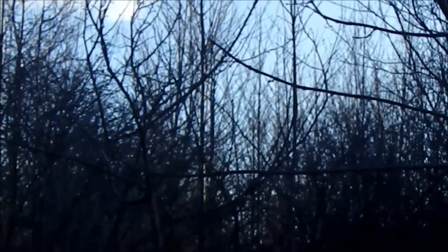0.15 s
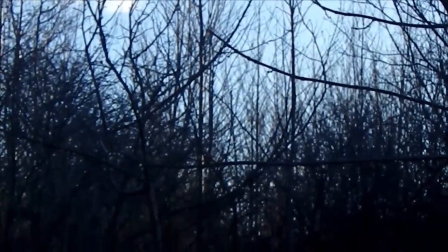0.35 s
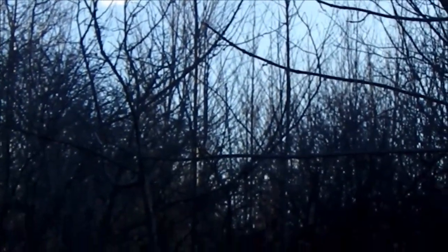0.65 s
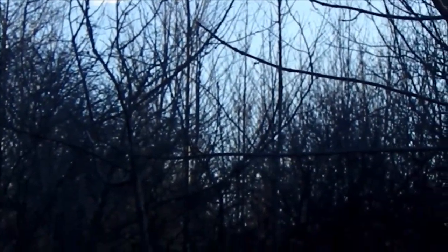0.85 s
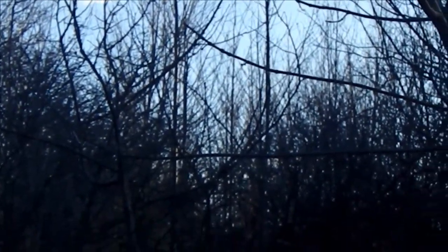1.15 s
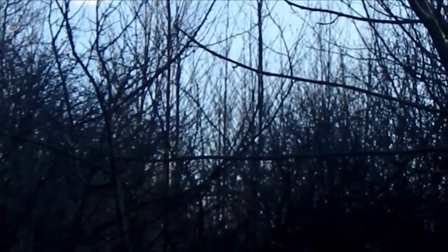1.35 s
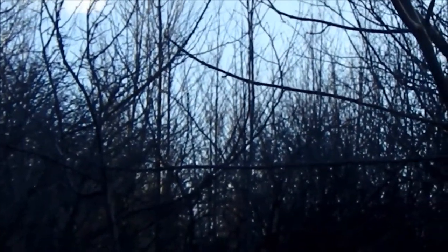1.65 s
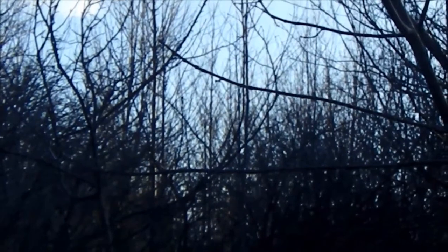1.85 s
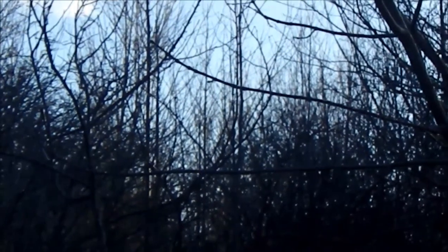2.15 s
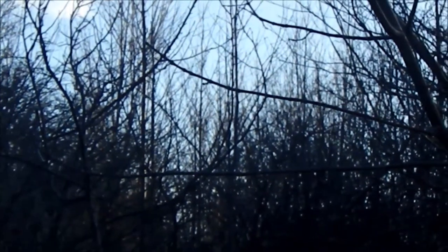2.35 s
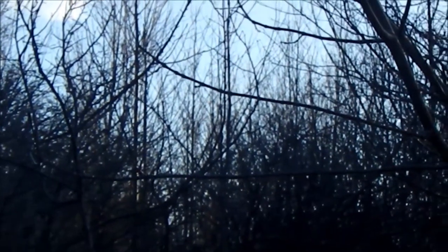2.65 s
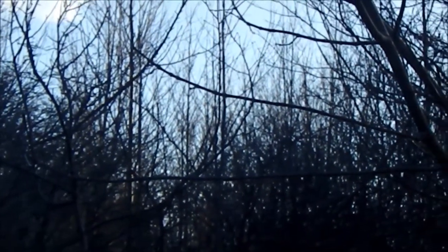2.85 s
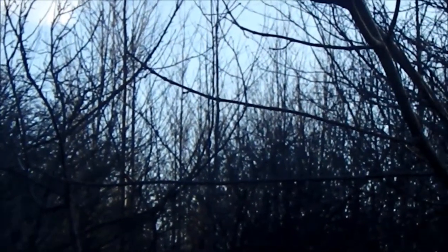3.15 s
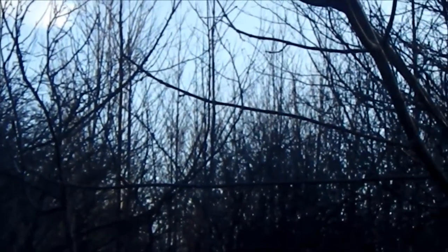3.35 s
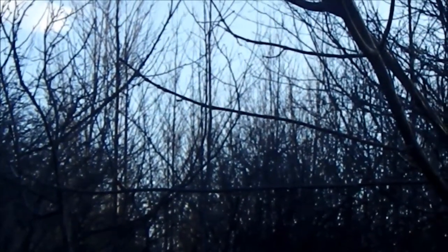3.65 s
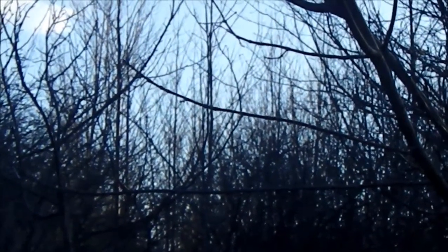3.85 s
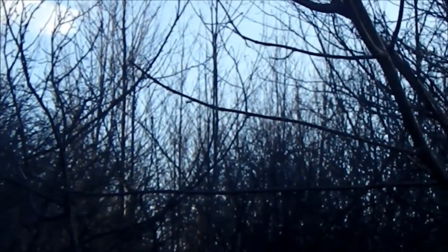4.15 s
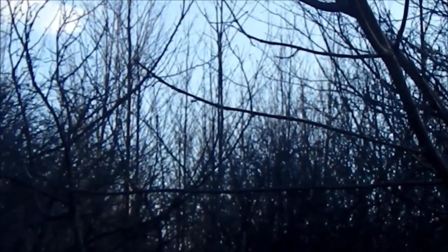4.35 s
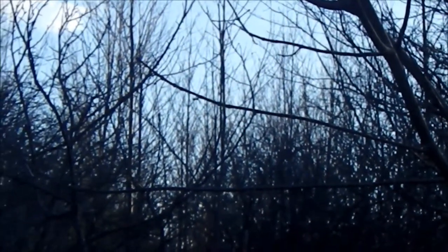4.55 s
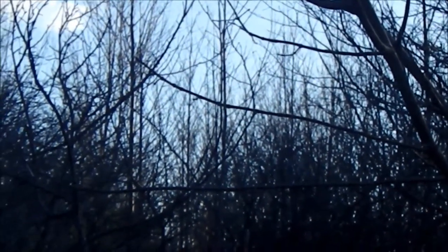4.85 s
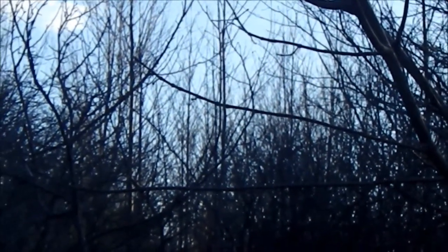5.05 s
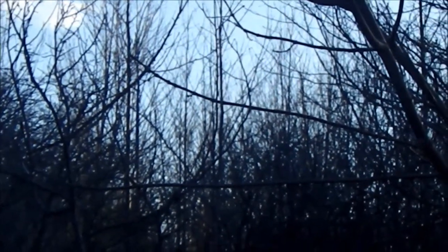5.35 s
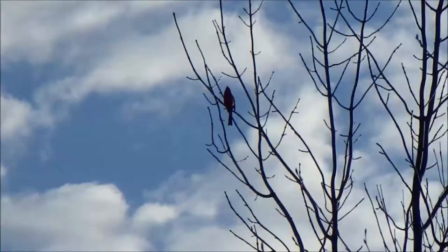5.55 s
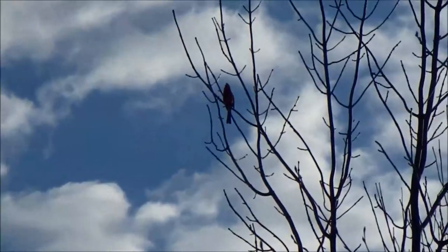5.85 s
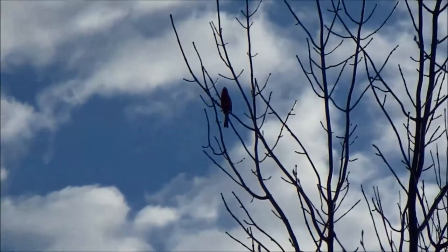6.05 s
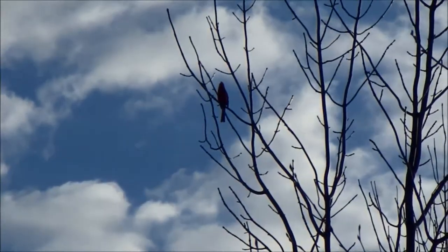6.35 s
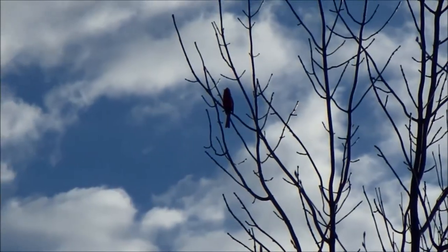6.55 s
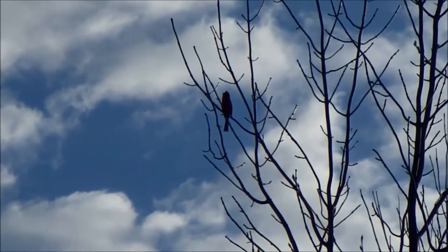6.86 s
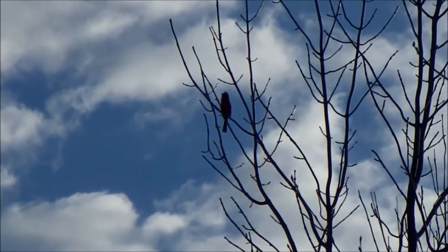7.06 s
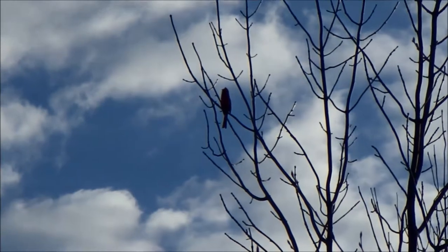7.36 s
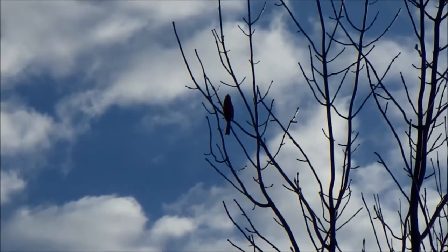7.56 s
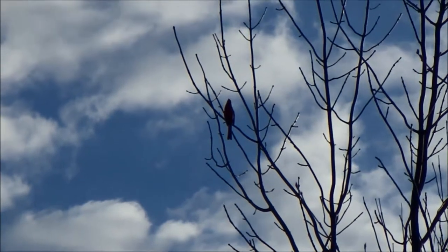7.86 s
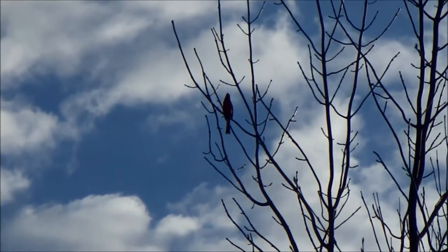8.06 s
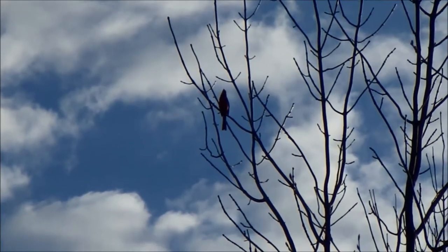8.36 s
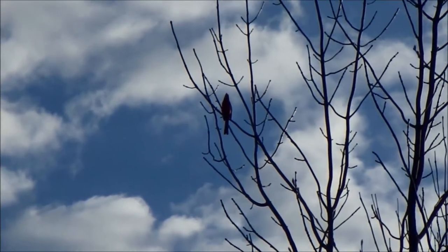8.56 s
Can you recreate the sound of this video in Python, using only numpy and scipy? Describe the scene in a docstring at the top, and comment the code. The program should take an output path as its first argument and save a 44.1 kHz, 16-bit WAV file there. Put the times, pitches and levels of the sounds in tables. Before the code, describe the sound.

A cardinal sings slow rising slurred whistles, then upward whips that come ever faster, over faint small birds and soft outdoor murmur in bare woods.

```python
"""Cardinal in a bare treetop

A cardinal sings two songs: slow rising slurs, then upward whips that come ever faster.
Each note is a gliding sine with overtones: a soft low lead-in breaks into a loud sweep, echoed by the
ground and the trunks. Further off a gull cries twice in hoarse and clear harmonics, small birds chip and
whistle in gliding sines, and shaped noise makes twig ticks, soft bumps, far calls and distant traffic."""
import sys
import numpy as np
from scipy import signal
from scipy.fft import rfft, irfft
from scipy.io import wavfile
from scipy.ndimage import uniform_filter1d

SR = 44100
rng = np.random.default_rng(int(sys.argv[2]) if len(sys.argv) > 2 else 0)


def unload_audio(sound):
    """Save the sound as a 16-bit wav file, at the path given as the first command line argument."""
    columns = np.transpose(np.atleast_2d(sound))
    # keep every value between -1 and 1, then stretch to whole-number steps
    steps = np.round(np.clip(columns, -1, 1) * 32767)
    wavfile.write(sys.argv[1], SR, steps.astype(np.int16))


N = 383229
TIME = np.arange(N) / SR


def undb(db):
    """Decibels to gain."""
    return 10 ** (np.asarray(db) / 20)


def gain_at(hz, spectrum):
    """Gain of a (f/Hz, level/dB) spectrum, joined on a log-frequency axis."""
    points, db = np.transpose(spectrum)
    return undb(np.interp(np.log(hz + 1), np.log(points), db))


def noise(spectrum):
    """Noise of unit rms with the given colour."""
    bins_hz = np.arange(N // 2 + 1) * SR / N
    x = irfft(rfft(rng.standard_normal(N)) * gain_at(bins_hz, spectrum), N)
    return x / x.std()


def walk(rate):
    """Smooth random drift with a new target rate times a second; spread 1."""
    hold = max(int(SR / rate), 1)
    steps = np.repeat(rng.standard_normal(N // hold + 1), hold)[:N]
    x = uniform_filter1d(steps, hold)
    return x / x.std()


def add(out, start, sound):
    """Mix a sound in at a time in seconds."""
    i = max(int(start * SR), 0)
    out[i:i + len(sound)] += sound[:max(N - i, 0)]


def envelope(t, length, attack, release):
    """Smooth attack, hold and release; length, attack and release share the unit of t."""
    rise = np.sin(np.pi / 2 * np.clip(t / attack, 0, 1))
    fall = np.sin(np.pi / 2 * np.clip((length - t) / release, 0, 1))
    return (rise * fall) ** 2


def strikes(rows, decay_s):
    """Loudness of (t/s, level/dB) events that start at once and die away exponentially."""
    out = np.zeros(N)
    for s, db in rows:
        add(out, s, undb(db) * np.exp(-TIME / decay_s))
    return out


def phase_of(hz, waver):
    """Phase of a pitch curve that a random stretch of waver bends."""
    start = rng.integers(N - SR)
    return 2 * np.pi * np.cumsum(hz * (1 + waver[start:start + len(hz)])) / SR


def woods(x, early_db, late_db, early_t60, late_t60):
    """Echoes only: near trunks throw back clumps of reflections, the deeper wood a long grainy tail."""
    t = TIME[:SR]
    # sparse random reflections: 1.5 % of samples for the trunks, 4 % for the depth
    trunks, depth = rng.standard_normal((2, SR)) * (rng.random((2, SR)) < [[.015], [.04]])
    clumps = undb(2.5 * walk(130)[:SR])
    build_up = 1 - np.exp(-t / .014)
    response = 0
    for grain, db, t60 in ((trunks, early_db, early_t60), (depth, late_db, late_t60)):
        tail = grain * clumps * np.exp(-np.log(1000) * t / t60) * build_up
        response = response + undb(db) * tail / np.linalg.norm(tail)
    return signal.fftconvolve(x, response)[:N]


def far_sound(spectrum, flutter_db, flutter_rate):
    """A sound that distance has smeared into a fluttering band of noise."""
    return noise(spectrum) * undb(flutter_db * walk(flutter_rate))


# colour of the outdoor rumble: f/Hz, relative level/dB
RUMBLE_COLOUR = [(12, -4.5), (25, -1.5), (45, -5), (80, -9), (125, -9), (190, -20), (300, -56)]
# slow course of the rumble, before its flutter: t/s, level/dB
RUMBLE_LEVEL = [(0, -54), (4.6, -52.5), (5.55, -51), (6.2, -55), (8.6, -53)]


def rumble():
    """Outdoor rumble: low fluttering noise that slowly rises and sinks."""
    level_db = np.interp(TIME, *np.transpose(RUMBLE_LEVEL))
    return far_sound(RUMBLE_COLOUR, flutter_db=1.2, flutter_rate=6.8) * undb(level_db)


# colour of the murmur in the mids: f/Hz, relative level/dB
MURMUR_COLOUR = [(110, -14.5), (180, -5), (237, -6), (286, -1), (366, -1), (486, 1), (602, -2), (792, -1.5),
                 (850, 0), (954, -1.5), (1040, -10.5), (1130, -9), (1220, -3.5), (1500, -19.5), (1950, -39),
                 (3300, -120)]
# colour of the airy hiss: f/Hz, relative level/dB
HISS_COLOUR = [(900, -17), (1500, 2.5), (2100, -1), (2800, -3), (3700, -1.5), (4500, -2.5), (5400, -5.5),
               (8000, -9), (14800, -7.5), (15700, -18)]


def air(murmur_db=-47, hiss_db=-53):
    """Outdoor bed: a murmur that barely flutters under a steady hiss."""
    murmur = noise(MURMUR_COLOUR) * undb(murmur_db + 0.11 * walk(5.3))
    return murmur + noise(HISS_COLOUR) * undb(hiss_db)


# colour of the buzzy trill: f/Hz, relative level/dB
TRILL_COLOUR = [(900, -2), (1550, 6), (2150, -7), (2600, -30), (3300, -12), (3550, 6), (3800, -6),
                (5100, 1), (5700, -32), (8000, -40)]


def trill(start_s=1.506, level_db=-50.0):
    """A buzzy trill: banded noise in fast flutter that fades in and out."""
    buzz = far_sound(TRILL_COLOUR, flutter_db=1.0, flutter_rate=70)
    return buzz * undb(level_db) * envelope(TIME - start_s, .8, 0.18, 0.15)


# colour of the far rasping calls: f/Hz, relative level/dB
RASP_COLOUR = [(950, -54), (1130, 0.5), (1220, 3.5), (1340, -3), (1600, -14), (2200, -16), (3200, -33),
               (6000, -70)]
# the rasping calls, before their onsets are softened: t/s, level/dB
RASP_CALLS = [(3.07, -43), (3.54, -47.5), (4.01, -48), (4.5, -50.5), (5.9, -50)]


def rasps():
    """Far rasping calls: rough noise with softened onsets that dies away slowly."""
    loudness = uniform_filter1d(strikes(RASP_CALLS, decay_s=0.42), size=5500)
    return far_sound(RASP_COLOUR, flutter_db=2.2, flutter_rate=40) * loudness


# colour of the distant traffic: f/Hz, relative level/dB
TRAFFIC_COLOUR = [(150, -19), (260, -6.5), (330, 6), (480, -10), (650, -6), (820, -3), (1050, -51)]


def traffic(start_s=5.63, level_db=-51):
    """One swell of distant traffic: low band noise under a slow envelope."""
    hum = far_sound(TRAFFIC_COLOUR, flutter_db=0.5, flutter_rate=5.5)
    return hum * undb(level_db) * envelope(TIME - start_s, 2.14, 0.53, 0.72)


def background():
    """Everything that lies behind the birds, mixed as one bed."""
    return rumble() + air() + trill() + rasps() + traffic()


# soft bumps: t/s, level/dB
BUMP_HITS = [(4.634, -42), (5.595, -40)]
# their dull colour: f/Hz, relative level/dB
BUMP_COLOUR = [(40, 0), (220, 6), (500, -31)]


def handling():
    """Soft handling bumps: short decaying bursts of dull noise."""
    return strikes(BUMP_HITS, decay_s=0.011) * noise(BUMP_COLOUR)


# twig ticks, before a common trim of -3 dB: t/s, level/dB
TWIG_TICKS = [(1.249, -41), (1.355, -39), (1.552, -32), (2.346, -42), (2.408, -44), (5.133, -38),
              (5.255, -34), (5.602, -37), (5.796, -37), (6.355, -23.5)]
# colour of dry wood: f/Hz, relative level/dB
TWIG_COLOUR = [(200, 9), (1100, 6), (2200, -9), (3500, -1), (5300, 1.5), (6300, -3), (12000, -29)]


def twigs():
    """Dry ticks: noise bursts that die in a few milliseconds, echoed by the wood."""
    out = undb(-3) * strikes(TWIG_TICKS, decay_s=.003) * noise(TWIG_COLOUR)
    return out + woods(out, early_db=-13, late_db=-22, early_t60=.12, late_t60=.6)


def whistle(length, start_hz, end_hz, arch_hz, waver, attack_share=0.14, release_share=0.15):
    """A pure glide bent into an arch."""
    t = np.arange(0, length, 1 / SR)
    u = t / length
    hz = start_hz + (end_hz - start_hz) * u + arch_hz * (1 - (2 * u - 1) ** 2)
    return envelope(u, 0.99, attack_share, release_share) * np.sin(phase_of(hz, waver))


def chip(buzz, length=0.024, start_hz=9700, end_hz=6450, fall_s=.0045):
    """A rough note that plunges and levels out."""
    t = np.arange(0, length, 1 / SR)
    hz = end_hz + (start_hz - end_hz) * np.exp(-t / fall_s)
    return envelope(t, length, 0.01, 0.0095) * np.sin(phase_of(hz, buzz))


# far whistles: t/s, length/s, start f/Hz, end f/Hz, arch added midway f/Hz, level/dB
FAR_WHISTLES = [(0.051, 0.26, 3690, 3670, 42, -61.5), (1.269, 0.26, 6520, 6480, 51, -54),
                (1.37, 0.2, 3990, 3804, 123, -51.5), (1.65, 0.13, 5250, 5290, -220, -51.5),
                (1.77, 0.092, 5220, 5100, 8, -56), (1.936, 0.067, 5020, 5000, -130, -53),
                (2.002, 0.066, 4960, 5070, 40, -49), (2.24, 0.083, 4930, 5030, 30, -58),
                (2.2, 0.1, 3820, 3850, 96, -60), (2.26, .06, 3050, 2250, 220, -54),
                (2.31, .05, 2280, 2700, -200, -58), (2.35, 0.075, 2730, 2400, 396, -54.5),
                (2.73, .11, 2000, 2100, 109, -59), (2.88, 0.12, 2330, 2400, 400, -54.5),
                (5.19, 0.096, 1270, 1214, 342, -51.5), (5.465, 0.095, 1284, 1227, 320, -53),
                (5.505, 0.071, 2970, 2320, 280, -51), (5.805, 0.15, 4240, 3680, 7, -56),
                (7.41, .17, 7040, 7330, -30, -55.5), (7.783, .165, 7000, 7100, 30, -48)]
# thin rising calls: t/s, level/dB
THIN_CALLS = [(.569, -62), (.644, -58), (1.004, -56), (1.084, -62), (1.184, -61), (5.152, -58),
              (5.364, -64)]
# a small bird's falling chips: t/s, level/dB
FALLING_CHIPS = [(.342, -46), (2.447, -46), (2.517, -49), (2.597, -50), (3.076, -45), (3.425, -43.5),
                 (3.517, -44), (3.814, -48.5), (5.027, -50)]


def small_birds():
    """Thin whistles and rough little chips from deeper in the wood: gliding sines with wavering pitch."""
    out = np.zeros(N)
    waver = 0.0051 * walk(90)
    buzz = .02 * walk(900)
    for s, length, start_hz, end_hz, arch_hz, db in FAR_WHISTLES:
        add(out, s, undb(db) * whistle(length, start_hz, end_hz, arch_hz, waver))
    for s, db in THIN_CALLS:
        call = whistle(length=.042, start_hz=5800, end_hz=6900, arch_hz=0, waver=waver)
        add(out, s, undb(db) * call)
    for s, db in FALLING_CHIPS:
        add(out, s, undb(db) * chip(buzz))
    return out + woods(out, early_db=-4.5, late_db=-7, early_t60=0.16, late_t60=0.44)


# how strongly each pitch of the gull's cry is heard, with a notch near 1070 Hz: f/Hz, level/dB
GULL_COLOUR = [(600, -18), (940, 3), (1010, 3), (1070, -14), (1190, 7.5), (1750, 3.5), (1970, -2),
               (2150, 1.5), (2450, -12), (3050, -4), (3500, -11), (4200, 5), (5000, -12), (6000, -30)]
# cries: t/s at the flip into the squeal, squeal length/s, squeal f/Hz before it sags,
# level/dB before each part's own offset
GULL_CRIES = [(0.646, .22, 1012, -49.5), (1.194, .19, 1086, -46.5)]


def gull(scoop_s=.085, drop_s=0.045, low_share=.53, scoop_rise=.28, scoop_db=3, sag=0.13, fade_db=-9,
         drop_share=.62, drop_fall=0.124, drop_db=3, dull_hz=2900):
    """A dull, hoarse scoop flips up into a bright sagging squeal, then drops back into the low voice."""
    out = np.zeros(N)
    clear, hoarse = 0.0054 * walk(180), 0.013 * walk(300)
    for s, squeal_s, hz, db in GULL_CRIES:
        scoop, squeal, drop = (np.linspace(0, 1, int(length * SR)) for length in (scoop_s, squeal_s, drop_s))
        # start in seconds, pitch as a share of the squeal's, level offset in dB, waver, treble edge in Hz
        parts = [(s - scoop_s, low_share + scoop_rise * scoop ** 2, scoop_db - 6 * (1 - scoop), hoarse, dull_hz),
                 (s, 1 - sag * squeal ** 2, fade_db * squeal ** 2, clear, SR),
                 (s + squeal_s, drop_share - drop_fall * drop, drop_db, hoarse, dull_hz / 2)]
        for start, share, part_db, waver, edge_hz in parts:
            pitch, t = hz * share, TIME[:len(share)]
            phase = phase_of(pitch, waver)
            cry = 0
            for k in range(1, 7):
                dulling = np.hypot(1, (k * pitch / edge_hz) ** 2)
                cry = cry + gain_at(k * pitch, GULL_COLOUR) / dulling * np.sin(k * phase)
            add(out, start, undb(db + part_db) * envelope(t, t[-1], 0.0059, 0.0039) * cry)
    return out + woods(out, early_db=-7, late_db=-12, early_t60=0.17, late_t60=0.92)


BREAK_HZ = 1898.6  # pitch at which a slur's lead-in turns into the sweep
BREAK_DIP_DB, BREAK_WIDTH_S, BREAK_LAG_S = -4.5, 0.0027, 0.0014  # the voice falters just before the break
SURGE_AT, SURGE_WIDTH = 0.372, .16  # the pitch spurts ahead partway up: place and width as shares of the sweep
EASY_DB, BRIGHT_DB_PER_DB = -18.5, 0.67  # notes louder than an easy one are also brighter
# what the throat and beak let through: f/Hz, level/dB
BEAK_RESONANCES = [(3900, 1), (5300, -10.5), (6200, -8), (7300, -1.5), (8400, 3), (9600, -8), (11500, -11),
                   (13500, -25)]
# overtones from twice the pitch upward, before beak and brightness: level/dB
OVERTONE_LEVELS = [-22.5, -26, -22, -30.5, -20.5]
# the voice gains strength as it climbs: f/Hz of the pitch, level/dB
REGISTER_STRENGTH = [(1230, -30.5), (1450, -30.5), (1600, -17.5), (1760, -10), (1870, -8), (2080, -1.5),
                     (2500, -2), (3400, -1)]


def cardinal_note(sweep_s, top_hz, lead_s, start_hz, break_hz, lead_bow, sweep_bow, surge_hz, swell_db,
                  attack_share, release_s, bright_db, waver,
                  split_db=-27, split_share=.87, split_ratio=1.575, purity_hz=2850):
    """A lead-in creeps up to the register break, the sweep climbs; a faint second voice joins at the top."""
    t = np.arange(0, lead_s + sweep_s, 1 / SR)
    lead = np.clip(t / lead_s, 0, 1)
    climb = np.clip((t - lead_s) / sweep_s, 0, 1)
    hz = start_hz + (break_hz - start_hz) * (1 - (1 - lead) ** lead_bow)
    hz = hz + (top_hz - break_hz) * climb ** sweep_bow
    hz = hz + surge_hz * np.exp(-((climb - SURGE_AT) / SURGE_WIDTH) ** 2)
    # the voice rounds the bend between lead-in and sweep
    hz = uniform_filter1d(hz, size=480, mode="nearest")

    falter_db = BREAK_DIP_DB * np.exp(-((t - lead_s + BREAK_LAG_S) / BREAK_WIDTH_S) ** 2)
    loud = gain_at(hz, REGISTER_STRENGTH) * undb(swell_db * climb + falter_db)
    loud = loud * envelope(t, lead_s + sweep_s, attack_share * lead_s, release_s)

    phase = phase_of(hz, waver)
    second, *upper = [undb(part_db) * gain_at(k * hz, BEAK_RESONANCES) * np.sin(k * phase) * (k * hz < SR / 2)
                      for k, part_db in enumerate(OVERTONE_LEVELS, 2)]
    # overtones belong to the low register and fade as the pitch climbs
    overtones = (second + undb(bright_db) * sum(upper)) / (1 + (hz / purity_hz) ** 12)
    # the air soaks up the highest of them on their way down from the treetop
    overtones = signal.sosfilt(signal.butter(3, 10800, fs=SR, output="sos"), overtones)
    at_top = (1 + np.tanh((hz / top_hz - split_share) / 0.0083)) / 2
    split = undb(split_db + bright_db) * at_top * np.sin(split_ratio * phase)
    return loud * (np.sin(phase) + overtones + split)


# a slur at the easy level; softer ones have less lead-in
SLUR_LEAD_S, SLUR_LEAD_S_PER_DB, SLUR_CREEP_HZ_PER_S = .08, .005, 4800
# slow slurs: t/s at the register break, sweep length/s, top f/Hz, level/dB before register and swell
SLOW_SLURS = [(3.098, 0.094, 3080, -28.3), (3.574, 0.099, 3036, -27), (4.006, .093, 3050, -20.5),
              (5.768, 0.097, 3044, -21.5)]


def slurs(waver, slur_bright_db=-6):
    """Slow rising notes: a creep up to the break, then a long bowed sweep."""
    out = np.zeros(N)
    for s, sweep_s, top_hz, db in SLOW_SLURS:
        over_db = db - EASY_DB
        lead_s = max(SLUR_LEAD_S + SLUR_LEAD_S_PER_DB * over_db, .02)
        note = cardinal_note(sweep_s, top_hz, lead_s, start_hz=BREAK_HZ - SLUR_CREEP_HZ_PER_S * lead_s,
                             break_hz=BREAK_HZ, lead_bow=0.86, sweep_bow=1.3, surge_hz=80, swell_db=.5,
                             attack_share=.9, release_s=.006,
                             bright_db=slur_bright_db + BRIGHT_DB_PER_DB * over_db, waver=waver)
        add(out, s - lead_s, undb(db) * note)
    return out


WHIP_SWEEP_S, WHIP_LEAD_S, WHIP_BOW, WHIP_SURGE_HZ = .043, .091, 1.09, 70  # a typical whip
# powers of haste: a hurried whip has a shorter lead-in, a deeper bow, a higher break, less surge
HASTE_LEAD, HASTE_BOW, HASTE_BREAK, HASTE_SURGE = 1.5, 0.69, 0.137, 4.3
SWELL_DB, SWELL_DB_PER_DB = 2.4, .9  # gain over an easy whip's sweep; louder whips swell more
# fast whips: t/s at the register break, sweep length/s, top f/Hz, level/dB before register and swell
FAST_WHIPS = [(4.37, 0.05, 3930, -20.5), (4.630, 0.051, 3905, -20), (4.865, 0.048, 3940, -19.7),
              (6.089, 0.05, 3820, -20), (6.3277, 0.051, 3840, -18.5), (6.560, 0.048, 3815, -17.5),
              (6.7725, 0.045, 3920, -17), (6.984, 0.044, 3950, -16.5), (7.187, 0.041, 3870, -16.5),
              (7.386, 0.043, 3940, -16), (7.5816, 0.044, 3900, -15.5), (7.7745, 0.042, 3940, -15),
              (7.963, .041, 3750, -16), (8.137, 0.036, 3785, -17.5), (8.300, 0.034, 3840, -16.5),
              (8.46, .034, 3820, -16.5), (8.619, .034, 3790, -16.5)]


def whips(waver):
    """Fast upward notes: haste sets lead-in, bow, break and surge; level sets swell and brightness."""
    out = np.zeros(N)
    for s, sweep_s, top_hz, db in FAST_WHIPS:
        over_db = db - EASY_DB
        haste = WHIP_SWEEP_S / sweep_s
        lead_s = WHIP_LEAD_S / haste ** HASTE_LEAD
        note = cardinal_note(sweep_s, top_hz, lead_s, start_hz=1230, break_hz=BREAK_HZ * haste ** HASTE_BREAK,
                             lead_bow=1.15 / haste, sweep_bow=WHIP_BOW * haste ** HASTE_BOW,
                             surge_hz=WHIP_SURGE_HZ / haste ** HASTE_SURGE,
                             swell_db=SWELL_DB + SWELL_DB_PER_DB * over_db, attack_share=.15,
                             release_s=0.0053, bright_db=BRIGHT_DB_PER_DB * over_db, waver=waver)
        add(out, s - lead_s, undb(db) * note)
    return out


# clear echoes off the ground, two trunks and the edge of the wood: delay t/s, level/dB
CLEAR_ECHOES = [(.0043, -11.5), (.0128, -21), (.021, -24), (.087, -32)]


def cardinal():
    """Slurs and whips, nearly pure, with clear single echoes and the diffuse reply of the wood."""
    waver = 0.0031 * walk(250)
    song = slurs(waver) + whips(waver)
    # the shortest echo beats against the sweep and ripples it
    echoes = sum(undb(db) * np.interp(TIME - delay, TIME, song) for delay, db in CLEAR_ECHOES)
    return song + echoes + woods(song, early_db=-11.7, late_db=-18.2, early_t60=.25, late_t60=.9)


def scene():
    """All sources summed into one channel."""
    return (background() + handling() + twigs() + small_birds() + gull() + cardinal())[None]


def record(dry, top_hz=15700):
    """A steep low-pass cuts the top of the treble."""
    return signal.sosfilt(signal.ellip(10, .2, 70, top_hz, fs=SR, output="sos"), dry)


dry = scene()
out = record(dry)
unload_audio(out)
```